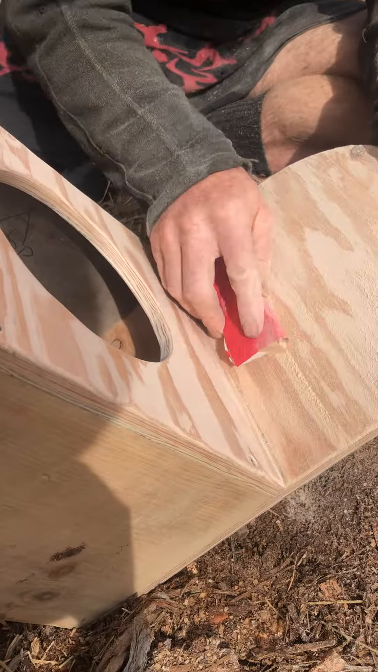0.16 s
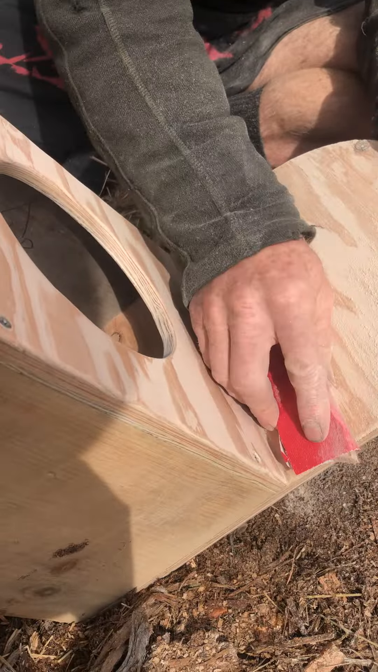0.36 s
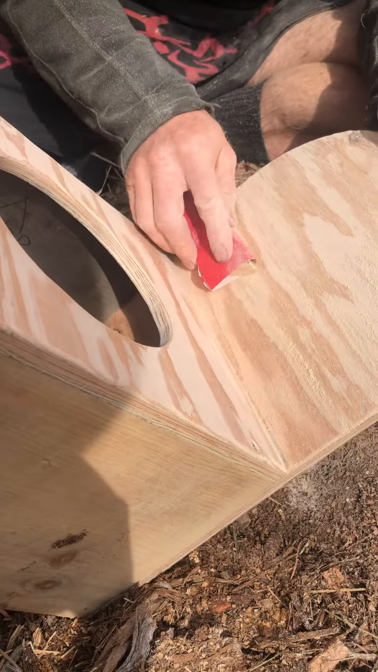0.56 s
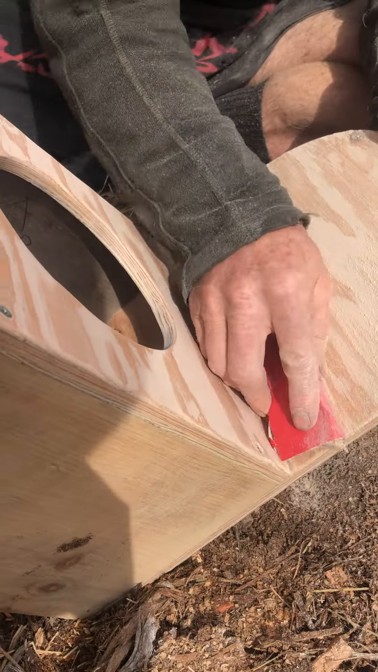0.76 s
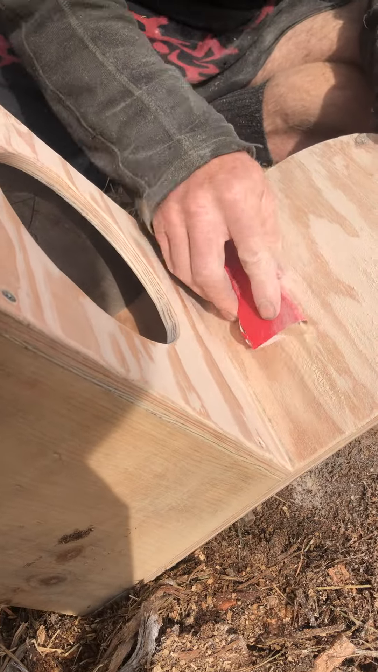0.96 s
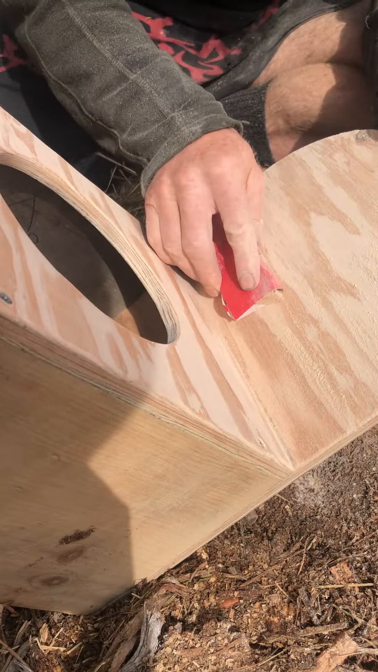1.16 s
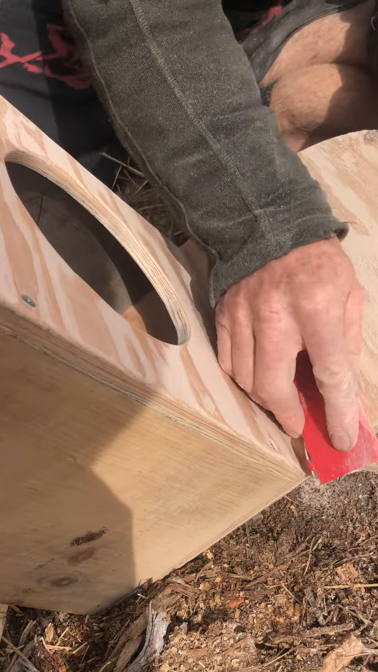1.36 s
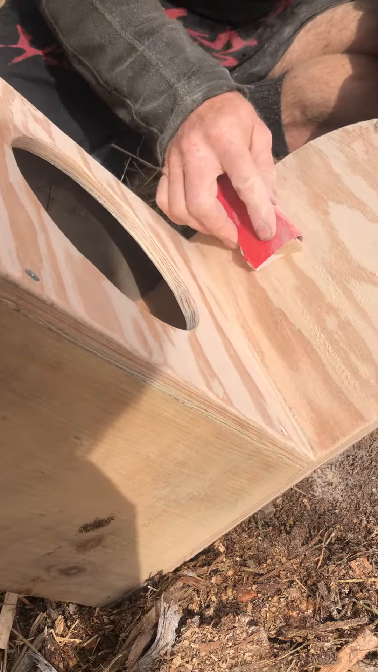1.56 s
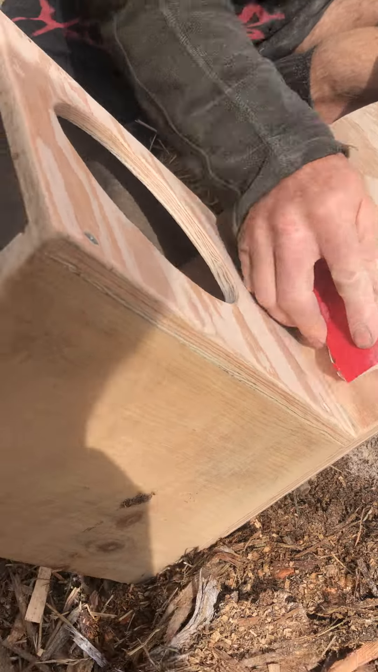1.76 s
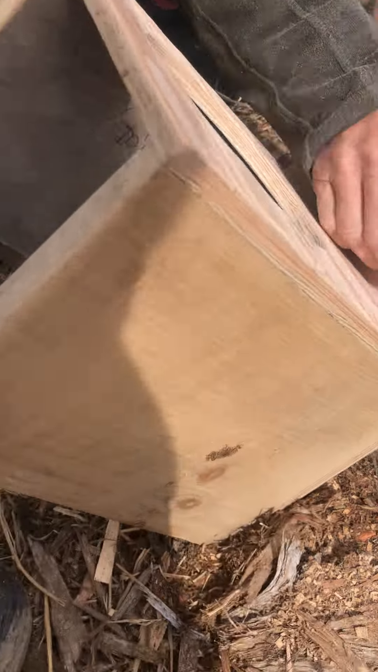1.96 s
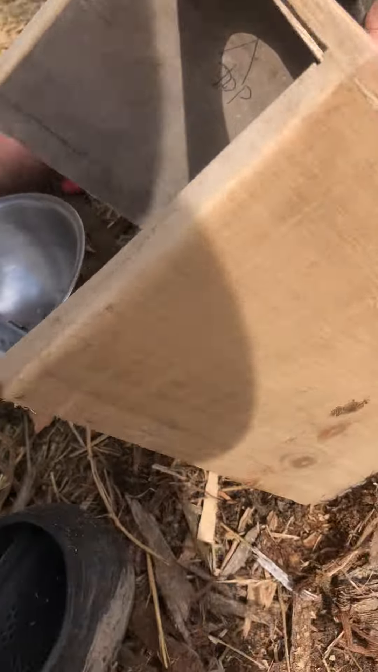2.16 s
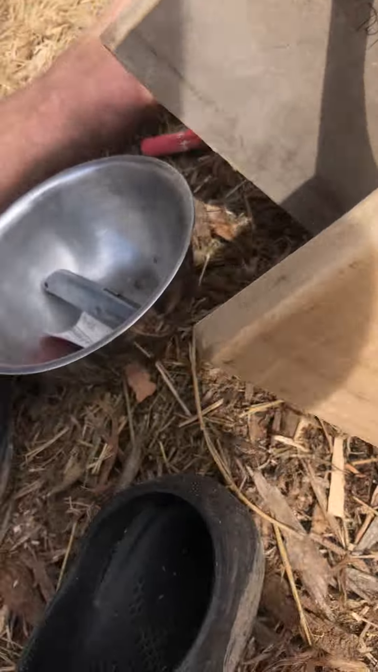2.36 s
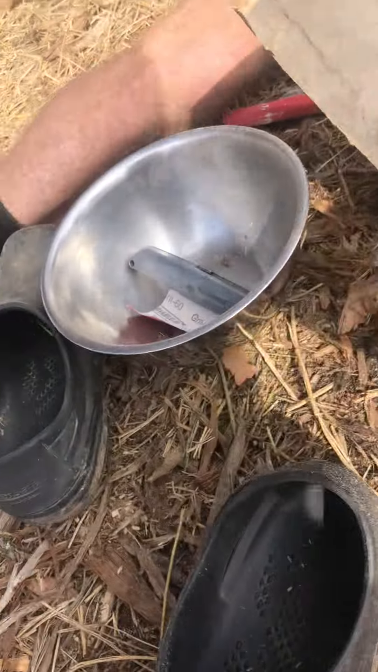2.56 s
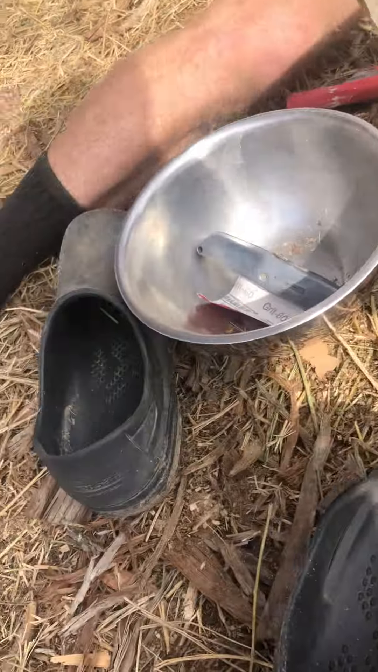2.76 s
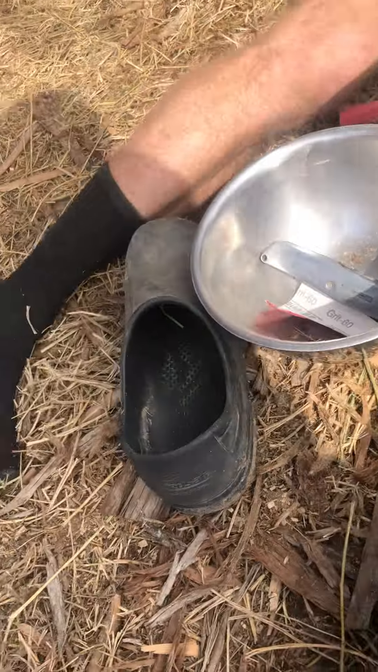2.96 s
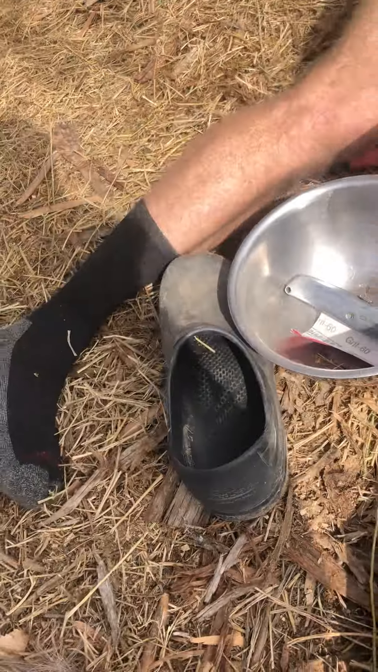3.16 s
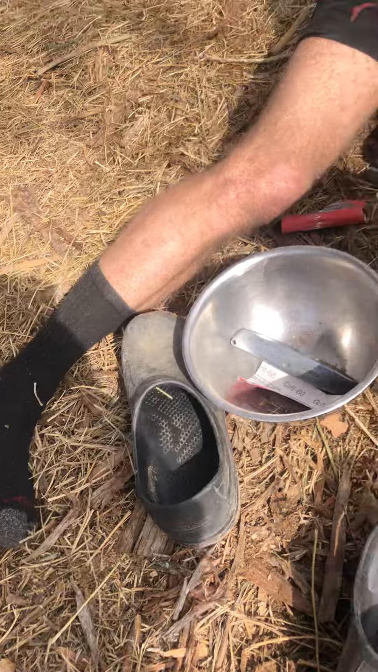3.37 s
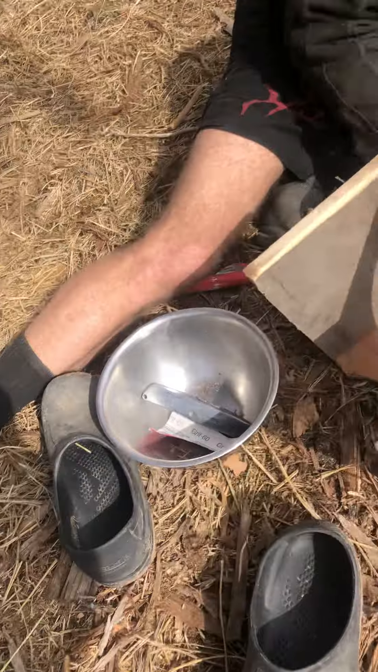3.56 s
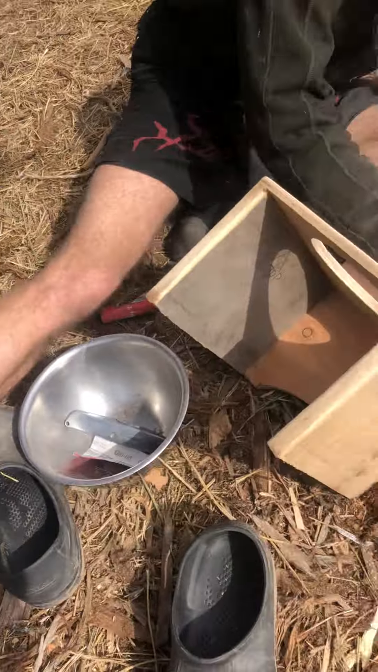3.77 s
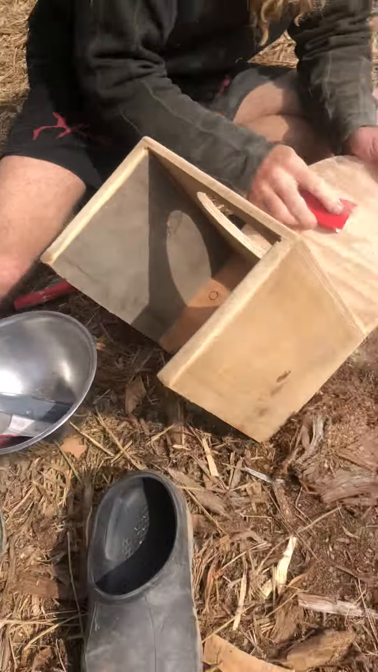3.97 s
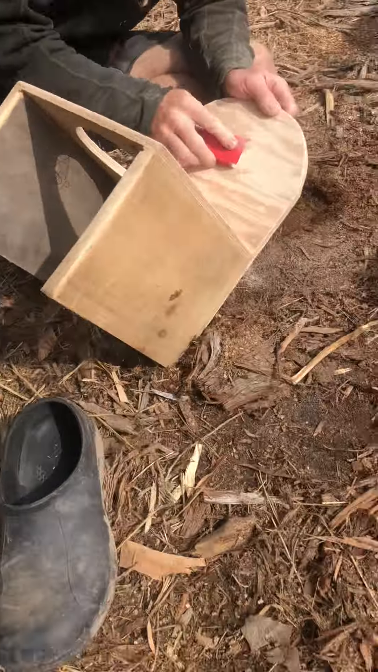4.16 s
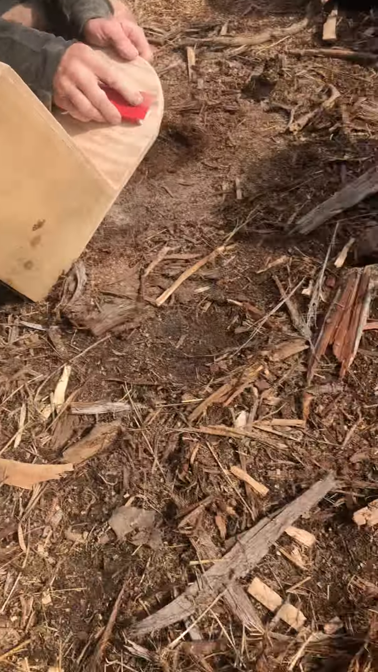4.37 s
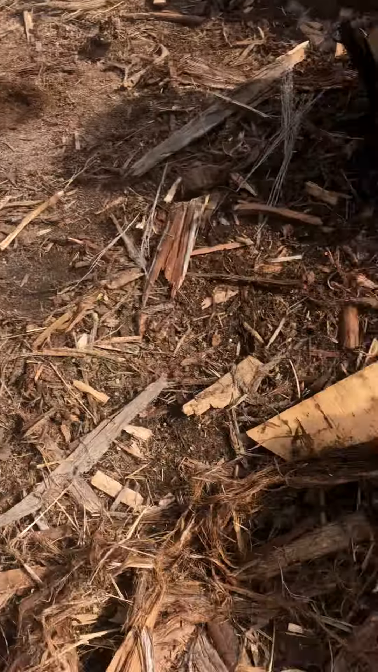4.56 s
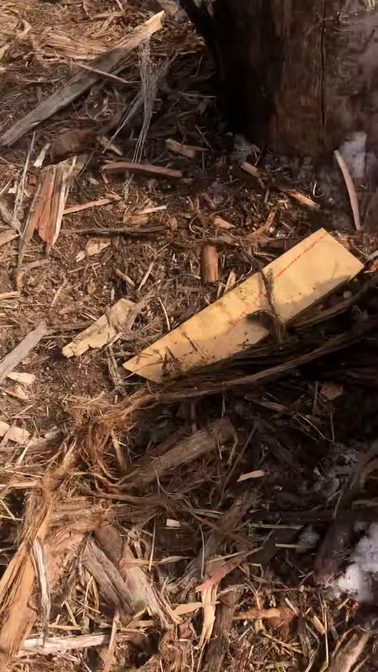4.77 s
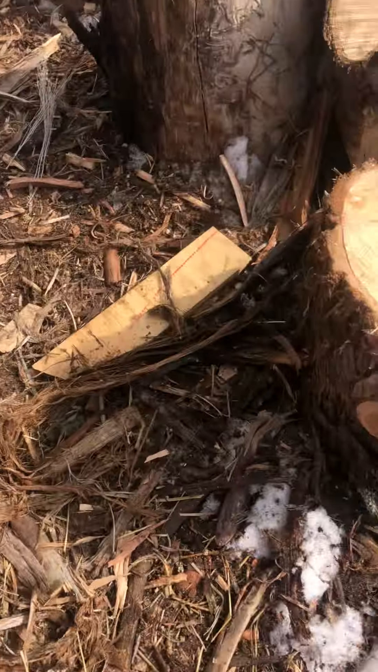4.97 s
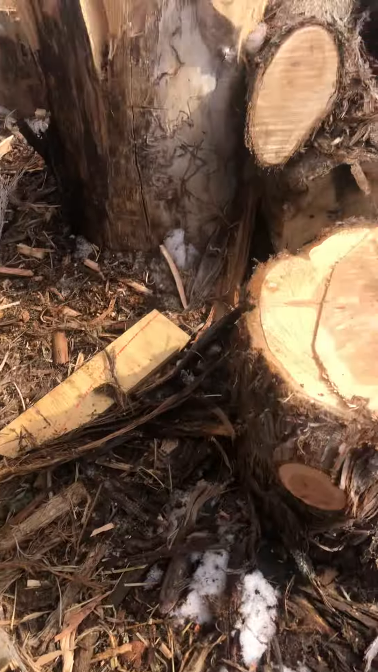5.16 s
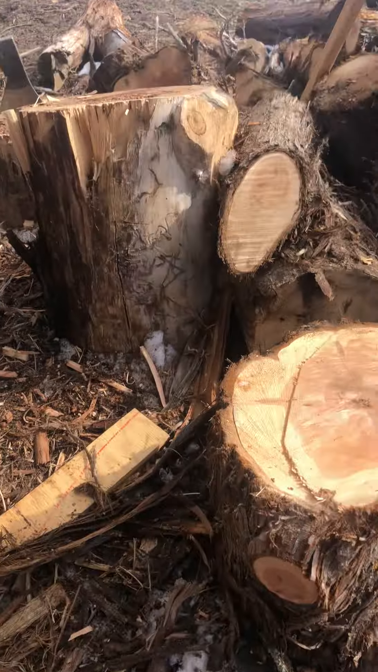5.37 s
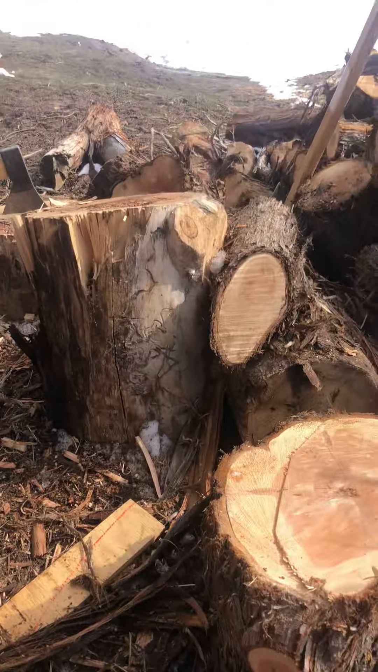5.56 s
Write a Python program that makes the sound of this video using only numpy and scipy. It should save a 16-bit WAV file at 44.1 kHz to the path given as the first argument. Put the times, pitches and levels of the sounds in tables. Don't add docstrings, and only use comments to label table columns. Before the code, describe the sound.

Dry, crisp sanding of a wooden box starts mid-stroke, alternating pull and push without pause. Each stroke swells and stops sharply, making the panels resonate. Irregular wind rumbles and pops hit the handheld microphone. After two seconds the rasp loses brightness and recedes, continuing quietly to the end with no echo.

```python
import sys
import numpy as np
from scipy import signal
from scipy.fft import rfft, irfft, next_fast_len
from scipy.io import wavfile
from scipy.ndimage import uniform_filter1d, map_coordinates

SR = 44100
rng = np.random.default_rng(int(sys.argv[2]) if len(sys.argv) > 2 else 0)


def log_audio(samples):
    frames = np.atleast_2d(samples).T
    limited = np.clip(frames, -1, 1)
    pcm = np.round(limited * 32767).astype(np.int16)
    wavfile.write(sys.argv[1], SR, pcm)


def voltage_ratio(level):
    return 10 ** (np.asarray(level, float) / 20)


N = 247837

# (start [s], end [s], rasp at full speed [dB],
# sharpness of the speed peak [exponent], grip: how hard the box is driven [dB])
STROKES = [(-0.137, 0.066, -26, 1.7, -5.5), (0.093, 0.338, -24.5, 2.22, -1.5), (0.36, 0.586, -27, 1.4, 0.3),
           (0.614, 0.837, -25.5, 1.9, -0.6), (0.864, 1.097, -27, 1.48, -0.1),
           (1.129, 1.36, -25, 1.84, -2.5), (1.387, 1.618, -27, 1.22, -1.8), (1.647, 1.878, -25, 2.32, -0.7),
           (1.903, 2.133, -29.5, 1.47, 1.1), (2.163, 2.369, -31, 1.4, 3), (2.395, 2.61, -33.5, 1.25, 1.9),
           (2.643, 2.863, -33.5, 1.75, 2.2), (2.889, 3.108, -36.5, 1.04, 2.5),
           (3.138, 3.344, -36, 1.4, 1.6), (3.37, 3.592, -37, 1.23, 2.4), (3.619, 3.836, -34.5, 1.8, 0.8),
           (3.857, 4.073, -34, 1.68, -2), (4.101, 4.319, -34.5, 1.36, 0.6),
           (4.348, 4.553, -34.5, 1.62, -2.2), (4.583, 4.799, -37, 1.34, 2.5),
           (4.819, 5.011, -37.5, 0.95, -0.8), (5.041, 5.231, -38, 1.48, 0.9), (5.253, 5.454, -37.5, 1, -2),
           (5.487, 5.673, -37.5, 1.35, 3)]
# (time [s], turned away [0-1], shade: block hidden by the box [0-1],
# work area towards the edge [0-1], box opening facing the microphone [dB])
VIEW = [(0, 0.1, 0.38, 0.15, 9), (0.45, 0.02, 0, 0.15, 1.5), (0.8, 0.33, 0.1, 0.22, 2),
        (1.2, 0.13, 0.22, 0.15, 2), (1.5, 0.3, 0.52, 0.13, 6.5), (1.75, 0.32, 0.38, 0.2, -1),
        (2.0, 0.3, 0, 0.3, 7), (2.25, 0.45, 0.67, 0.17, -1), (2.55, 0.97, 0.85, 0.33, 2.2),
        (2.95, 0.7, 0.42, 0.37, 0.3), (3.25, 0.87, 0.63, 0.26, 1.5), (3.55, 1, 0, 0.36, 7),
        (3.85, 0.9, 0.16, 0.47, 2.5), (4.1, 0.88, 0.5, 0.54, 9), (4.45, 0.93, 0.26, 0.6, -1),
        (4.85, 0.94, 0.37, 0.5, 8), (5.3, 1, 0.22, 0.36, -8), (5.62, 1, 0.02, 0.77, -6)]
# (frequency [Hz], density [dB per Hz])
RASP_FRONT = [(2350, -17), (4000, 1), (4590, -0.5), (5270, 2), (7160, 1.5), (9500, -0.5), (12400, -13.5),
              (20900, -120)]
RASP_ASIDE = [(2600, -24.5), (3900, -3.5), (4700, -1), (5400, -3), (6000, -3.5), (7100, -3), (9500, -9.5),
              (12400, -32), (20000, -120)]
# (frequency [Hz], density [dB per Hz])
FIZZ = [(5290, -24), (9000, -4.5), (10700, 1), (11600, -2), (14800, 3.5), (15300, -0.5), (15800, 5)]
# (time [s], centre [Hz], boost [dB])
GLINT = [(0, 5200, 2), (1.9, 5560, 2.5), (2.3, 6400, 3), (3.2, 5040, -2), (3.6, 5570, 7), (4.1, 5340, -0.5),
         (4.45, 6000, 1.5), (4.7, 5960, 7.5), (4.92, 5660, 7.5), (5.15, 6400, 4.5), (5.24, 6600, 4),
         (5.26, 4030, 4), (5.62, 4180, 6.5)]
# (frequency [Hz], width [Hz], level [dB])
PLY_FRONT = [(2130, 1600, -10.5), (2715, 300, 10), (3175, 530, 7.5), (3950, 810, -0.5)]
PLY_ASIDE = [(2196, 890, 17.35), (2790, 1770, 21.2), (3655, 870, 23.4)]
# (frequency [Hz], width [Hz], level [dB])
MID_PANEL = [(833, 79, -12), (965.5, 44.4, 6), (1060, 190, -2), (1337, 254, -2.5), (1528, 326, 1.5),
             (1820, 17, -10.5), (2059, 486, 0)]
EDGE_PANEL = [(790, 9.7, -12), (1026, 60, -6.5), (1224, 137, -1), (1484, 252, 4), (1776, 140, 2),
              (2044, 570, 1.5)]
# (frequency [Hz], width [Hz], level [dB])
HOLLOW = [(560, 58, 0), (605, 23.3, 4), (751, 47, -1.5)]
# (time [s], buffet level [dB])
BREEZE = [(0, -74), (0.1, -63), (0.25, -63), (0.45, -42), (0.9, -44.5), (1.2, -40.5), (1.55, -56),
          (2.4, -58), (3.35, -47), (3.7, -57), (3.85, -58), (4.3, -41.5), (4.6, -41.5), (4.9, -39),
          (5.25, -39), (5.5, -38), (5.6, -56)]
# (start [s], hold [s], buffet level [dB], flutter against buffet [dB])
GUSTS = [(0.294, 0.06, -43, -10), (0.525, 0.12, -30, -13.5), (0.69, 0.015, -40, -20),
         (0.778, 0.024, -31.5, -3), (0.844, 0.055, -34, -25), (1.036, 0.079, -26, -13),
         (1.158, 0.06, -30, -14), (1.28, 0.015, -40, -22), (1.347, 0.04, -42, -26),
         (1.417, 0.047, -45, -12), (1.573, 0.017, -54, -16), (1.684, 0.12, -33.5, -7),
         (2.063, 0.063, -41, -13), (2.2, 0.03, -50, -13), (2.444, 0.054, -43.5, -21),
         (2.737, 0.027, -34.5, -20), (2.886, 0.019, -41, -19), (2.952, 0.016, -38.5, -14),
         (3.174, 0.01, -40, -25), (3.257, 0.015, -51, -14), (3.42, 0.1, -44, -10),
         (3.923, 0.02, -35.5, -13), (3.983, 0.009, -28, -25), (4.076, 0.11, -32, -16),
         (4.25, 0.015, -46, -14), (4.375, 0.039, -26.5, -8.5), (4.456, 0.08, -35.5, -8.5),
         (4.62, 0.12, -34.5, -24), (4.821, 0.043, -35, -28), (5.404, 0.035, -30, -18)]
# (frequency [Hz], density [dB per Hz])
BUFFET = [(15, -70), (30, -15), (50, 5), (75, 7.5), (125, -1), (170, -7), (260, -27), (400, -70)]
# (frequency [Hz], density [dB per Hz])
FLUTTER = [(90, -58), (150, -17), (200, 4.5), (300, -2), (450, -10.5), (700, -10.5), (1200, -74)]
# (time [s], peak [dB], snap: starting pitch excess [times the pitch])
POPS = [(0.538, -17.5, 0.44), (0.782, -16.5, 1.3), (0.827, -24, 1.5), (1.073, -14.5, 2.54),
        (1.135, -20.5, 0.78), (1.286, -32, 0.78), (1.699, -22, 0.64), (2.068, -38, 0.72),
        (2.727, -26.5, 0.76), (3.172, -44, 1.2), (3.536, -29, 0.97), (3.923, -34.5, 1.4),
        (3.985, -27, 0.83), (4.056, -23, 0.76), (4.143, -18.5, 1.24), (4.183, -19, 1.26),
        (4.248, -23.5, 0.81), (4.34, -22, 0.67), (4.375, -30, 2), (4.386, -14.5, 0.38), (4.408, -14.5, 2.6),
        (4.512, -25, 0.89), (4.634, -21.5, 1.2), (4.822, -30.5, 1.56), (5.409, -21, 0.77)]
# (frequency [Hz], density [dB per Hz])
AIR = [(40, -5), (150, 2.5), (500, -11), (1000, -6), (2000, -30), (5000, -33.5), (12000, -34), (15800, -45)]
# (time [s], peak [dB])
SNAGS = [
    (0.3355, -19),
    (0.828, -26),
    (3.132, -50),
]
# (time [s], from [Hz], to [Hz], side level [dB])
SPLITS = [
    (0.68, 5160, 6370, -33),
    (0.68, 9600, 11200, -35),
    (1.005, 11000, 15800, -32),
    (1.427, 7600, 9900, -38),
    (2.027, 4200, 5130, -34),
    (2.027, 14400, 15800, -41),
]
# (frequency [Hz], peak [dB], decay by 60 dB [s])
BOWL = [(4215, -63, .4), (7790, -62, .3)]

PANEL_DB = (-3.5, 0, 0, -2)
HOLLOW_DB = (-17, -18.5, -17.5, -8.5)
PLY_DB = (-2.5, -4, -4.5, -2.5)
GRAIN_DB, GRAIN_PLACE = 0.46, 0.17


def unit(x):
    return x / np.sqrt(np.mean(x ** 2) + 1e-20)


def curves(rows):
    s, *cols = np.transpose(rows)
    return [np.interp(np.arange(N) / SR, s, c) for c in cols]


def wobble(rate):
    knots = rng.standard_normal(int(N * rate / SR) + 4)
    return map_coordinates(knots, [np.arange(N) * rate / SR])


def filtered(x, response):
    m = next_fast_len(N + 8192)
    return irfft(rfft(x, m) * response(np.fft.rfftfreq(m, 1 / SR)), m)[:N]


def coloured(x, spectrum):
    f, db = np.transpose(spectrum)

    def response(hz):
        return voltage_ratio(np.interp(np.log(hz + 1), np.log(f), db, left=-120, right=-120))
    return unit(filtered(x, response))


def ringing(x, modes):
    def response(f):
        total = 0
        for k, (centre, width, db) in enumerate(modes):
            mode = 1j * f * width / (centre * centre - f * f + 1j * f * width)
            total = total + (-1) ** k * voltage_ratio(db) * mode
        return total
    return unit(filtered(x, response))


def two_views(drive, share, first, second):
    fade_out = np.sqrt(1 - share) * ringing(drive, first)
    fade_in = np.sqrt(share) * ringing(drive, second)
    return np.std(drive) * (fade_out + fade_in)


def patchy(x, depth_db):
    z = signal.stft(x, nperseg=512)[2]
    field = uniform_filter1d(rng.standard_normal(z.shape), size=7, axis=0)
    field = uniform_filter1d(field, size=8, axis=1)
    return signal.istft(z * voltage_ratio(depth_db * unit(field)), nperseg=512)[1][:N]


def grit(scatter_db):
    size_db = scatter_db * np.clip(rng.standard_normal(N), -2, 2)
    return unit(rng.standard_normal(N) * voltage_ratio(size_db))


def motion(steep):
    t, out = np.arange(N) / SR, np.zeros((2, N))
    for k, (start, end, db, sharp, _) in enumerate(STROKES):
        push = k % 2
        skew = (1.22, 0.96)[push] + (-0.032, 0.035)[push] * start
        fizz_db = (-0.2, -0.9)[push]
        span = slice(max(round((start - .03) * SR), 0), round((end + .02) * SR))
        since = t[span] - start - .003
        progress = np.clip((t[span] - start) / (end - start), 0, 1)
        speed = np.sin(np.pi * (0.069 + 0.86 * progress ** skew))
        loose = 1 / (1 + np.exp(-since / .0015))
        creep = voltage_ratio(-13.0 - 5.5 * (1.0 - push)) * np.clip(1 + since / 0.052, 0, 1)
        stop = 1 / (1 + np.exp((t[span] - end) / 0.0017))
        stroke = np.abs(speed) ** (steep * sharp) * np.maximum(loose, creep) * stop
        out[:, span] += stroke * voltage_ratio([[db], [db + fizz_db]])
    return out


def travel():
    start = np.transpose(STROKES)[0]
    turn_s = np.append(start, STROKES[-1][1])
    turns = np.interp(np.arange(N) / SR, turn_s, np.arange(len(start) + 1))
    return (1 - np.cos(np.pi * turns)) / 2


def box_level(levels, away, far):
    near_front, far_front, near_aside, far_aside = levels
    front = near_front + (far_front - near_front) * far
    aside = near_aside + (far_aside - near_aside) * far
    return (1 - away) * front + away * aside


def glint(x, width):
    hz, t, z = signal.stft(x, SR, nperseg=512)
    s, centre_hz, db = np.transpose(GLINT)
    octaves = np.log2((hz[:, None] + 1) / np.interp(t, s, centre_hz))
    boost_db = np.interp(t, s, db) * np.exp(-(octaves / width) ** 2)
    return signal.istft(z * voltage_ratio(boost_db), nperseg=512)[1][:N]


def rasp_and_fizz(press, away, shade):
    grains = patchy(grit(scatter_db=1.5), depth_db=0.9) * press
    tearing = (1 - away) * coloured(grains, RASP_FRONT) + away * coloured(grains, RASP_ASIDE)
    rasp = motion(steep=0.89)[0] * unit(glint(tearing, width=0.17))
    fizz = motion(steep=1.02)[1] * voltage_ratio(-8 * shade) * coloured(grains, FIZZ)
    return rasp + fizz


def top_ply(press, away, shade, far, grip_db):
    ply_db = box_level(PLY_DB, away, far) + 0.2 * grip_db - 2 * shade + GRAIN_DB * wobble(12)
    shallow = patchy(grit(scatter_db=6.5), depth_db=0.77) * press
    drive = motion(steep=0.76)[0] * voltage_ratio(ply_db) * shallow
    return voltage_ratio(-0.53) * two_views(drive, away, PLY_FRONT, PLY_ASIDE)


def free_span(drive, far):
    total = 0
    for spot in np.linspace(0, 1, num=9):
        share = np.clip(1 - 8 * np.abs(far - spot), 0, 1)
        pitch_hz = np.interp(spot, [0, 1], (618, 1470))
        total = total + np.sqrt(share) * ringing(drive, [(pitch_hz, 95, 0)])
    return np.std(drive) * total


def box_body(press, view, far, grip_db):
    away, shade, area, opening_db = view
    panel_db = box_level(PANEL_DB, away, far) + grip_db + 3 * shade + GRAIN_DB * wobble(7)
    hollow_db = box_level(HOLLOW_DB, away, far) + opening_db + 2 * GRAIN_DB * wobble(14)
    place = area + far * (0.2 + (0.27 - 0.2) * away) + GRAIN_PLACE * wobble(8)
    drive = motion(steep=0.36)[0] * voltage_ratio(panel_db) * patchy(grit(scatter_db=0), depth_db=2.22) * press
    panel = two_views(drive, np.clip(place, 0, 1), MID_PANEL, EDGE_PANEL)
    air_drive = drive * voltage_ratio(hollow_db)
    hollow = np.std(air_drive) * ringing(air_drive, HOLLOW)
    span_drive = motion(steep=0.7)[0] * voltage_ratio(panel_db) * grit(scatter_db=1.5)
    span_db = -10.5 + (-18.5 + 10.5) * away
    return voltage_ratio(0.5) * panel + voltage_ratio(-8.0) * hollow + voltage_ratio(span_db) * free_span(span_drive, far)


def sanding():
    *shares, opening_db = curves(VIEW)
    away, shade, area = np.clip(shares, 0, 1)
    far = travel()
    grip_db, = curves([((start + end) / 2, grip) for start, end, *_, grip in STROKES])
    press = voltage_ratio(0.23 * wobble(30) + 0.25 * wobble(120))
    direct = rasp_and_fizz(press, away, shade)
    ply = top_ply(press, away, shade, far, grip_db)
    return direct + ply + box_body(press, (away, shade, area, opening_db), far, grip_db)


def gusts():
    t, breeze = np.arange(N) / SR, voltage_ratio(curves(BREEZE)[0])
    power = np.array([breeze, breeze * voltage_ratio(-11.5)]) ** 2
    for s, hold, db, flutter_db in GUSTS:
        span = slice(round((s - .1) * SR), round((s + .5) * SR))
        rise = 1 / (1 + np.exp((s - t[span]) / (0.0064 / 2)))
        fall = voltage_ratio(-448 * np.clip(t[span] - s - hold, 0, None))
        power[:, span] += (rise * fall * voltage_ratio([[db], [db + flutter_db]])) ** 2
    return np.sqrt(power)


def steady(x, s):
    return x / np.sqrt(np.abs(uniform_filter1d(x ** 2, size=round(s * SR))) + 0.024)


def pops():
    x, t = np.zeros(N), np.arange(SR // 20) / SR
    for s, db, snap in POPS:
        turns = 123.8 * (0.77 * t + snap * 0.0054 * (1 - np.exp(-t / 0.0031)))
        rise = 1 - np.exp(-(t / .0025) ** 2)
        x[round(s * SR):][:len(t)] += voltage_ratio(db + 3.0 - 60 * t / 0.048) * rise * np.sin(2 * np.pi * turns)
    return x


def wind():
    buffet, flutter = gusts()
    lumps = 1.5 * np.clip(wobble(30), -2, 1.3)
    low = steady(coloured(rng.standard_normal(N), BUFFET), 0.0405)
    quick = steady(coloured(rng.standard_normal(N), FLUTTER), 0.018)
    quick_lumps = 1.3 * lumps + 1.7 * np.clip(wobble(45), -2, 1.4)
    pressure = buffet * voltage_ratio(1.56) * unit(voltage_ratio(lumps) * low)
    turbulence = flutter * voltage_ratio(-4.5) * unit(voltage_ratio(quick_lumps) * quick)
    return pressure + turbulence + pops()


def outdoor_air():
    return voltage_ratio(-55) * coloured(rng.standard_normal(N), AIR)


def snags():
    x, t = np.zeros(N), np.arange(200) / SR
    for s, db in SNAGS:
        x[round(s * SR):][:200] += voltage_ratio(db - 60 * t / 0.0015) * rng.standard_normal(200)
    return filtered(x, lambda hz: (1j * hz / (3500 + 1j * hz)) ** 2)


def splits():
    t, x = np.arange(N) / SR, np.zeros(N)
    for s, lo_hz, hi_hz, db in SPLITS:
        swell = np.cos(np.pi * np.clip((t - s) / 0.032, -.5, .5))
        band = filtered(rng.standard_normal(N), lambda hz: (hz > lo_hz) & (hz < hi_hz))
        x += voltage_ratio(db) * swell * unit(band)
    return x


def bowl():
    t = np.clip(np.arange(N) / SR - 3.105, 0, None)
    return sum(voltage_ratio(db - 60 * t / t60) * np.sin(2 * np.pi * hz * t) for hz, db, t60 in BOWL)


def scene():
    return np.tile(sanding() + wind() + outdoor_air() + snags() + bowl(), (2, 1))


def low_pass(x):
    return signal.sosfilt(signal.butter(12, 15960, fs=SR, output="sos"), x)


def record(dry):
    mic = filtered(dry[0], lambda hz: (hz < 15840) * (1j * hz / (36 + 1j * hz)) ** 2)
    return low_pass(mic + splits() * [[1], [-1]])


dry = scene()
out = record(dry)
log_audio(out)
```